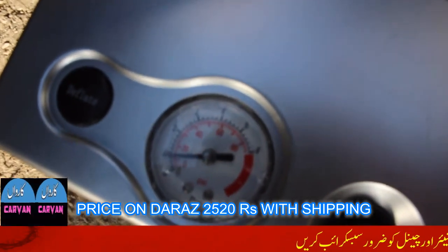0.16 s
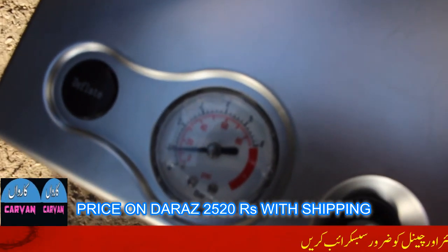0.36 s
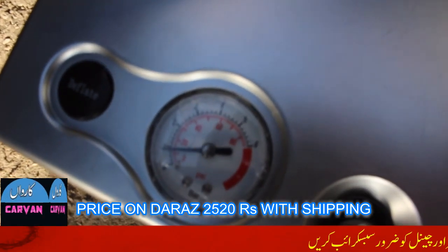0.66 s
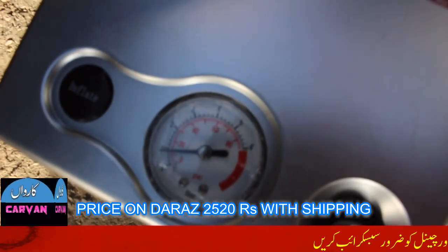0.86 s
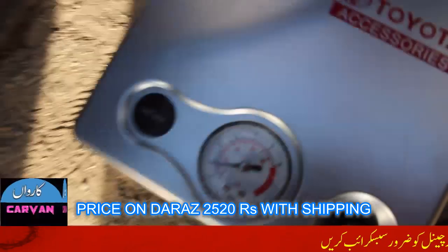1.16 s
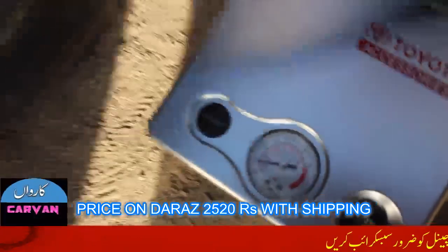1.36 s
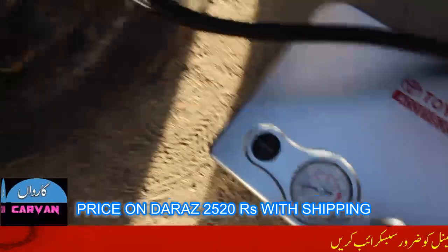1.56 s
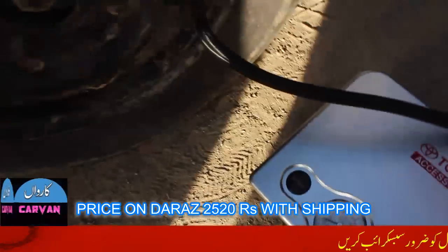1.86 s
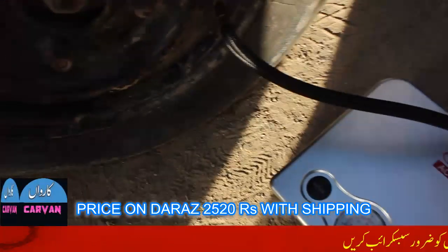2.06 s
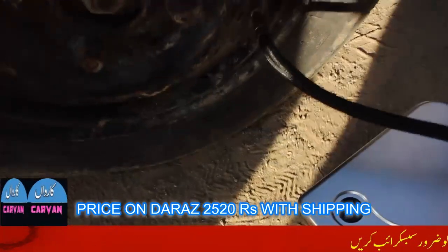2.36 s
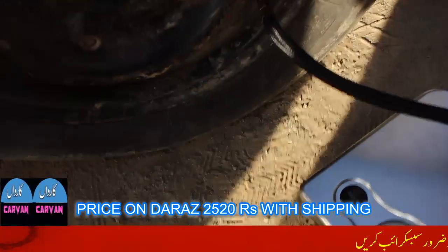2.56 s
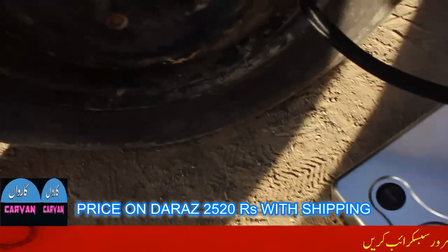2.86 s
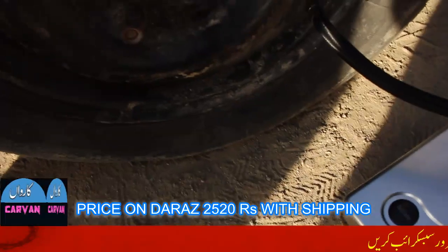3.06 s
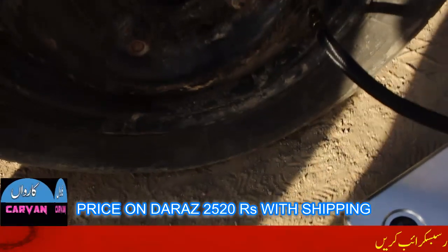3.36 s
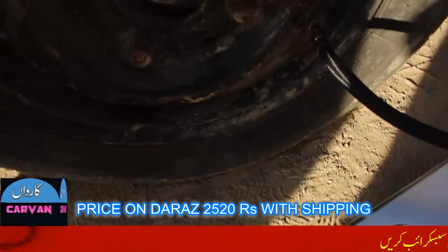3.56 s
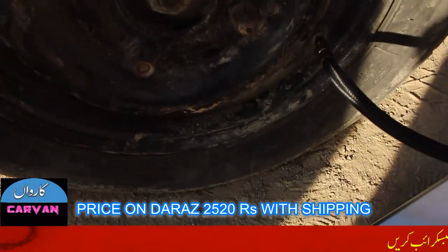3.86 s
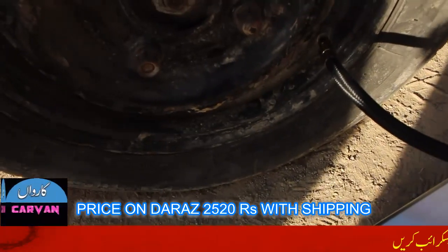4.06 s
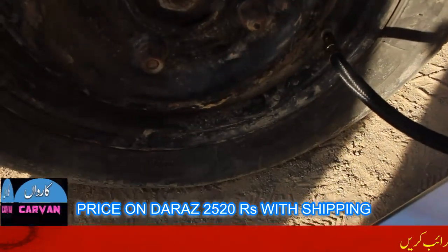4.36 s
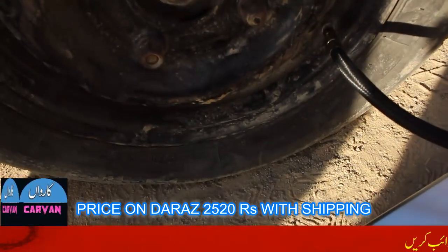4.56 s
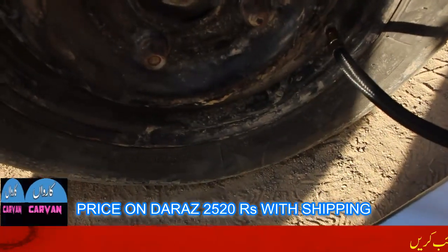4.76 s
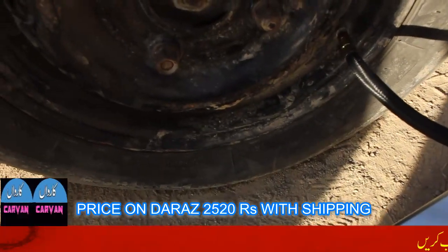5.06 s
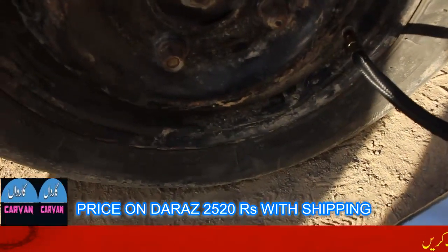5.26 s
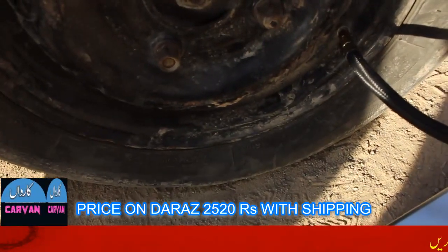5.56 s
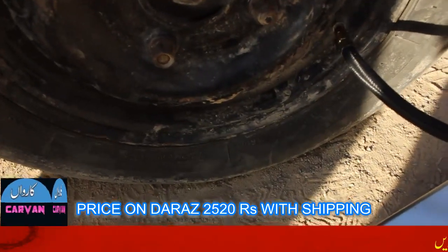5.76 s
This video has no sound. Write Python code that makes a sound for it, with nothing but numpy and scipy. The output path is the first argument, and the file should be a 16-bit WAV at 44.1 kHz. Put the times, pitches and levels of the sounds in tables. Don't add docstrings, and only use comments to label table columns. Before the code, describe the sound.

Close-up, a portable tyre inflator rattles fast and hollow, air hissing in quick pulses, over the faint rumble of an idling car outdoors.

```python
import sys
import numpy as np
from scipy import signal
from scipy.fft import rfft, irfft
from scipy.io import wavfile
from scipy.ndimage import uniform_filter1d

SR = 44100
rng = np.random.default_rng(int(sys.argv[2]) if len(sys.argv) > 2 else 0)


def inscribe(sig):
    pcm = np.round(np.clip(np.atleast_2d(sig).T, -1, 1) * 32767)
    wavfile.write(sys.argv[1], SR, pcm.astype(np.int16))


def how_loud(loudness_db):
    steps = np.asarray(loudness_db, float) / 20
    return 10 ** steps


N = 261072
TIME = np.arange(N) / SR
FREQ = np.fft.rfftfreq(N, 1 / SR) + 1e-3
BEFORE = 512


def level(x, db):
    return x * how_loud(db) / np.sqrt(np.mean(x ** 2))


def along(table, hz=FREQ):
    f, value = np.transpose(table)
    return np.interp(np.log(hz), np.log(f + 0.00045), value)


def walk(rate):
    hold = int(SR / rate)
    steps = np.repeat(rng.standard_normal(N // hold + 1), hold)
    return 0.67 * uniform_filter1d(uniform_filter1d(steps, hold), hold)[:N]


def gulp(turns, at, sharp):
    return np.exp(sharp * (np.cos(2 * np.pi * (turns - at)) - 1))


def crank():
    # t/s, turns per s
    speed = [
        (0.0, 32.017),
        (0.33, 31.911),
        (1.04, 31.408),
        (2.21, 31.27),
        (2.79, 31.319),
        (3.31, 31.2),
        (3.96, 31.229),
        (5.29, 31.071),
        (5.92, 31.072),
    ]
    return np.cumsum(np.interp(TIME, *np.transpose(speed))) / SR


def valve(turns, lead, jitter_s, scatter_db, at, sharp, steady, blown_db):
    turns = np.r_[turns[0] * np.arange(1 - BEFORE, 1), turns]
    stroke = np.arange(int(turns[-1]) + 1)
    late, harder = rng.standard_normal((len(stroke), 2)).T
    place = np.interp(stroke - lead, turns, np.arange(len(turns))) + SR * jitter_s * late
    size = how_loud(scatter_db * harder)
    i = place.astype(int)
    snaps = np.zeros(len(turns))
    snaps[i] = size * (1 - place + i)
    snaps[i + 1] = size * (place - i)
    blown = rng.standard_normal(len(turns)) * (steady + gulp(turns, at, sharp))
    return level(blown, blown_db) - level(snaps, 0)


def struck(x, table, size=8192):
    cep = irfft(np.log(how_loud(along(table, np.fft.rfftfreq(size, 1 / SR) + 1e-3))))
    cep[1:size // 2] *= 2
    cep[size // 2 + 1:] = 0
    response = irfft(np.exp(rfft(cep)))
    return signal.fftconvolve(x, response)[BEFORE:BEFORE + N]


def case(turns, top):
    # f/Hz, level/dB
    case_top = [(222, -32), (317, -17), (380, -6.5), (444, -8), (475, 1.5), (507, -3), (539, -9),
                (571, 0.5), (602, -2), (634, -13.5), (666, -22), (729, -18.5), (824, -42), (1200, -43.5)]
    # f/Hz, level/dB
    case_side = [(218, -40), (312, -33), (374, -20.5), (437, -12), (468, -6), (499, -3), (530, 1),
                 (562, -4.5), (624, -8.5), (655, -13.5), (687, -36.5), (718, -25.5), (811, -52.5),
                 (1200, -53.5)]
    # level/dB under the case, phase/radians
    gear_tones = [
        (-16, .25),
        (-27, -2.2),
        (-28, -2.6),
        (-30, 1.6),
        (-32, -.2),
    ]
    gear_teeth = (181, 150, 163, 185, 180)
    pinion = 11
    drive = valve(turns, lead=.134, jitter_s=.00002, scatter_db=.2, at=.15, sharp=2.1, steady=.5, blown_db=-15.5)
    from_top = top * level(struck(drive, case_top), 0)
    from_side = (1 - top) * level(struck(drive, case_side), 0)
    load = gulp(turns, at=-.05, sharp=1.07) * (1 - .5 * top)
    hum = np.zeros(N)
    for teeth, (db, phase) in zip(gear_teeth, gear_tones):
        hum += how_loud(db + 0.32 * walk(4.56)) * np.cos(2 * np.pi * turns * teeth / pinion + phase)
    return from_top + from_side + 3.1 * load * hum


def ring(x, hz, width_hz):
    b, a = signal.iirpeak(hz, hz / width_hz, SR)
    return signal.lfilter(b, a, signal.lfilter(b, a, x))


def reed(turns, lead, hz, width_hz, rough_db):
    drive = valve(turns, lead, jitter_s=.00005, scatter_db=-0.8, at=.05 - lead, sharp=1.7,
                  steady=0.34, blown_db=rough_db)
    return level(ring(drive, hz, width_hz)[BEFORE:], 0)


def metal_parts(turns, heard_db, edge):
    # level/dB by the wheel, more/dB above the lid, more/dB facing the valve end
    lid_db = (-49.5, 25.5, -5)
    lid_wheel_db = (-45, -7.5, -9.5)
    reed_db = (-44.5, -.5, 7.5)
    panel_db = (-42, -.3, 5)
    seat_db = (-42.5, -22, 3)
    parts = how_loud(heard_db(lid_db)) * reed(turns, lead=0.1006, hz=1145, width_hz=106, rough_db=-17.0)
    parts += how_loud(heard_db(lid_wheel_db)) * reed(turns, lead=0.0999, hz=1121, width_hz=64, rough_db=-12.5)
    parts += how_loud(heard_db(reed_db)) * reed(turns, lead=.05, hz=1745, width_hz=85, rough_db=-4)
    parts += how_loud(heard_db(panel_db)) * reed(turns, lead=0.078, hz=629, width_hz=130, rough_db=6)
    parts += how_loud(-46) * edge * reed(turns, lead=0.099, hz=1200, width_hz=76, rough_db=-4)
    parts += how_loud(heard_db(seat_db)) * reed(turns, lead=0.11, hz=2289, width_hz=210, rough_db=3.0)
    return parts


def air(turns, tilt_db, top):
    # f/Hz, level/dB per Hz
    rush = [(440, -23), (750, -9), (1000, -10), (1110, -7.5), (1490, -7), (1740, -3.5), (2300, -5),
            (2580, -8), (3120, -11.5), (3680, -17), (5590, -17.5), (10800, -32.5), (15700, -49)]
    # f/Hz, width/Hz, level/dB
    hose = [(2057, 115, 4.5), (2746, 15.5, 10), (3020, 113, 6), (3210, 100, 3), (3680, 170, -1.5),
            (4320, 92, -7.5), (4410, 260, 6), (4550, 81, -0.5), (5440, 110, 7), (8260, 720, 1.5),
            (10800, 180, 3)]
    # f/Hz, level/dB
    above_lid = [(800, 10.5), (1000, 5.5), (1400, -4), (2000, -0.5), (2600, 3.5), (3200, 4.5), (4000, 1.5),
                 (5500, 0.5), (7000, -1), (9000, 6.5), (11500, -15), (12500, 3.5), (15000, 6)]
    peaks_db = sum(db / (1 + (2 * (FREQ - f) / w) ** 2) for f, w, db in hose)
    colour = how_loud(along(rush) + peaks_db)
    stroke = np.floor(turns + .3).astype(int)
    draw = 0.6 + (0.2 + 0.45 * top) * gulp(turns, at=0.23, sharp=3.7)
    mid = rfft(rng.standard_normal(N)) * colour
    side = rfft(rng.standard_normal(N)) * colour
    norm = np.sqrt(np.mean(irfft(mid * ((FREQ > 1900) & (FREQ < 3300)), N) ** 2))
    blow = rng.standard_normal(stroke.max() + 2)[stroke]
    out = np.zeros((2, N))
    for octave in np.arange(-5, 10) / 3:
        band = np.clip(1 - 3 * np.abs(np.log2(FREQ / 2000) - octave), 0, 1)
        high = np.clip(octave / 0.93, 0, 2)
        own = np.tanh(rng.standard_normal(stroke.max() + 2)[stroke])
        puff = gulp(turns, at=-0.09 + 0.016 * high, sharp=6.5)
        size = 0.44 + 0.041 * octave + 0.35 * max(octave - 2.2, 0)
        size = size * how_loud(1.9 * blow + 2.7 * high * own)
        drift_db = (0.2 + 1.03 * high) * walk(6.3) + tilt_db * high
        drift_db += top * along(above_lid, 2000 * 2 ** octave)
        hiss = np.array([irfft(mid * band, N), irfft(side * band, N)])
        out += (draw + size * puff) * how_loud(drift_db) * hiss
    return out / norm / 0.8


def car():
    # f/Hz, level/dB rms
    firing = [
        (81.3, -46.5),
        (121.9, -58),
        (162.6, -55.5),
        (283.6, -47.5),
    ]
    rumble_colour = how_loud(along([(15, -22), (30, -16), (60, -15.5), (120, -11.5), (170, -13), (250, -12.5),
                               (330, -11), (450, -4), (800, -54)]))
    beat = np.cumsum(1 + 0.0058 * walk(3.027)) / SR
    out = np.zeros((2, N))
    for side in range(2):
        out[side] = level(irfft(rfft(rng.standard_normal(N)) * rumble_colour, N), -40.5)
    for hz, db in firing:
        out[0] += how_loud(db + 3.2 * walk(8)) * np.sqrt(2) * np.sin(2 * np.pi * hz * beat)
    return out


def two_microphones(solid, same, other):
    # f/Hz, level/dB
    balance_db = [(110, 0.5), (380, -1), (560, -1.2), (650, -4), (1150, -4.5), (1750, -4), (2400, -3),
                  (4400, -2.5), (8100, 0.5)]
    # f/Hz, share 0-1
    unrelated = [(25, .12), (60, .025), (150, 0.027), (600, 0.055), (1200, 0.42), (3000, 0.36),
                 (8000, 0.51), (12000, 0.98)]
    # f/Hz, phase/radians
    left_lead = [(100, 0.), (400, -.35), (700, -.45), (1100, -.1), (2400, .2), (3000, -.7), (4400, .3),
                 (5800, -.5), (8700, -.7), (11500, -1.3)]
    share = np.clip(along(unrelated), 0, 1)
    tilt = how_loud(along(balance_db) / 2) * np.exp(.5j * along(left_lead))
    dull = 1 / (1 + (FREQ / 3500) ** 4) / (1 + (150 / FREQ) ** 4)
    common = dull * rfft(solid) + np.sqrt(1 - share / 2) * rfft(same)
    apart = np.sqrt(share / 2) * rfft(other)
    return np.array([irfft((common + apart) * tilt, N), irfft((common - apart) / tilt, N)])


def scene():
    # t/s, share above the lid 0-1, share facing the valve end 0-1
    phone = [
        (0.0, 0.5, 0.02),
        (1.15, 0.45, 0.),
        (1.5, 0.25, 0.2),
        (1.8, 0.01, 0.75),
        (2.2, 0., 1.),
        (2.65, 0., 0.83),
        (3.05, 0.02, 0.47),
        (4.3, 0.04, 0.02),
        (5.92, 0.12, 0.2),
    ]
    # level/dB by the wheel, more/dB above the lid, more/dB facing the valve end
    case_db = (-18.5, -0.05, 0.16)
    air_db = (-38, 5, 0.85)
    treble_db = (0, -1, 0.55)
    turns = crank()
    t, above, toward = np.transpose(phone)
    top = np.clip(np.interp(TIME, t, above), 0, 1)
    facing = np.clip(np.interp(TIME, t, toward), 0, 1)

    def heard_db(part):
        return part[0] + part[1] * top + part[2] * facing

    edge = np.exp(-((TIME - 1.6) / 0.27) ** 2)
    solid = how_loud(heard_db(case_db)) * case(turns, top) + metal_parts(turns, heard_db, edge)
    hiss = how_loud(heard_db(air_db)) * air(turns, heard_db(treble_db) + 1 * edge, top)
    same, other = hiss + car()
    return two_microphones(solid, same, other)


def low_pass(x):
    return signal.sosfilt(signal.butter(12, 15820, fs=SR, output="sos"), x)


def record(dry):
    return low_pass(dry)


dry = scene()
out = record(dry)
inscribe(out)
```